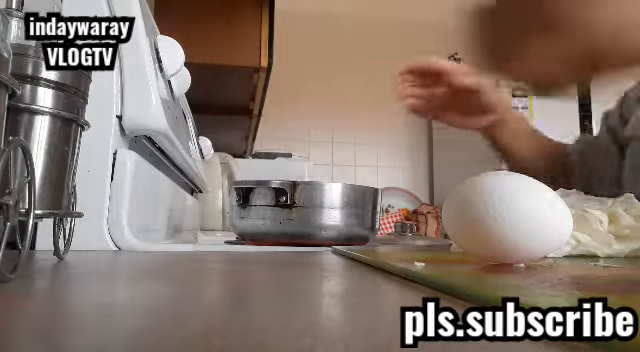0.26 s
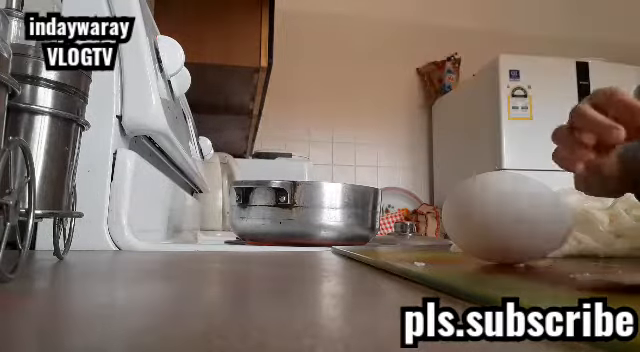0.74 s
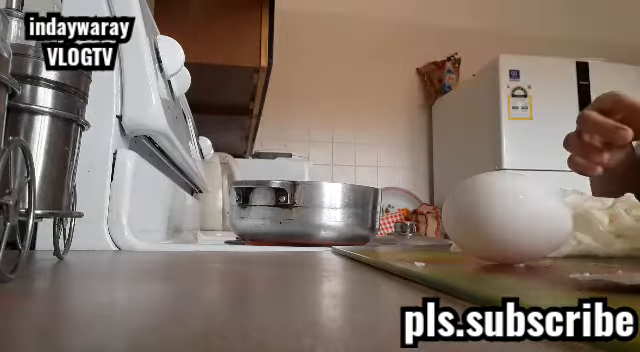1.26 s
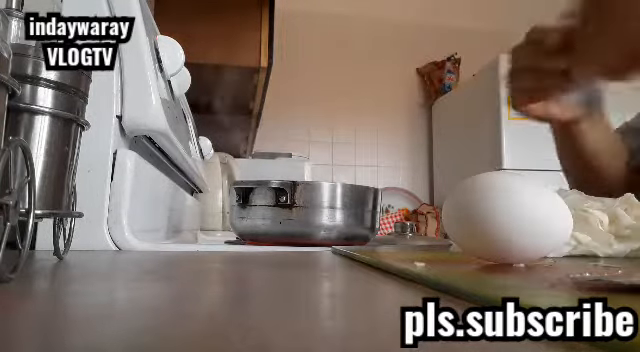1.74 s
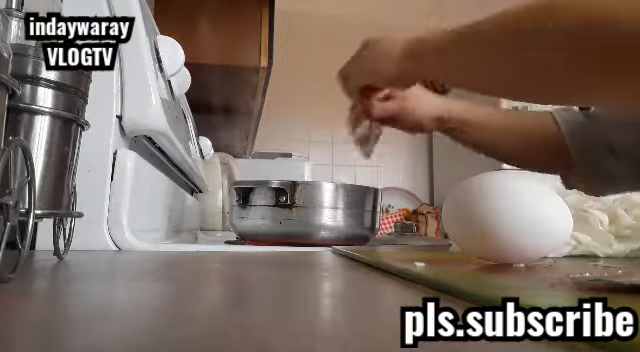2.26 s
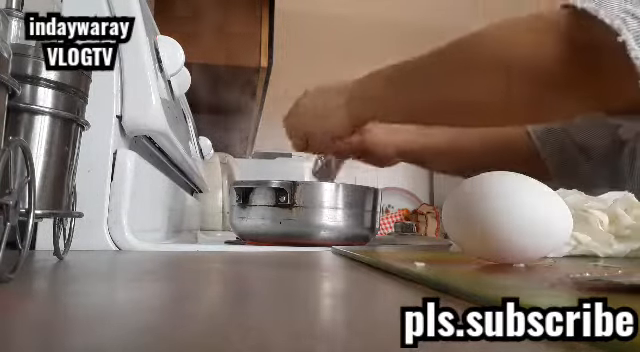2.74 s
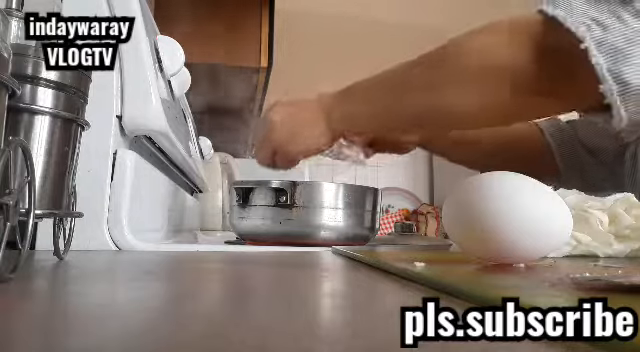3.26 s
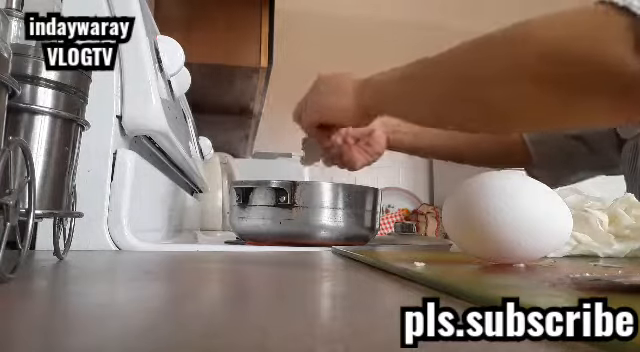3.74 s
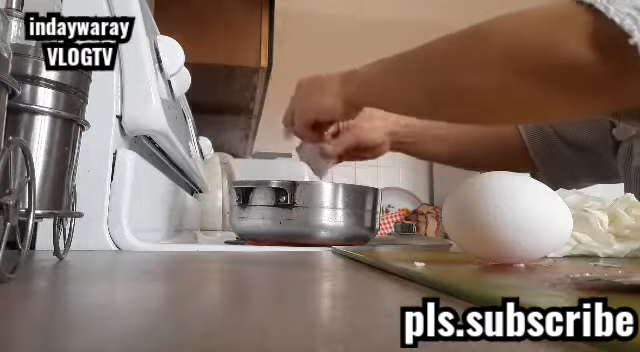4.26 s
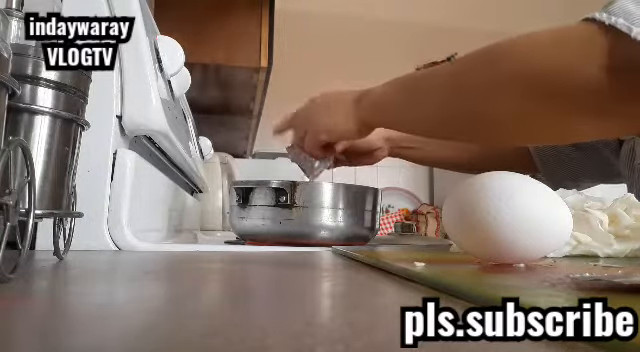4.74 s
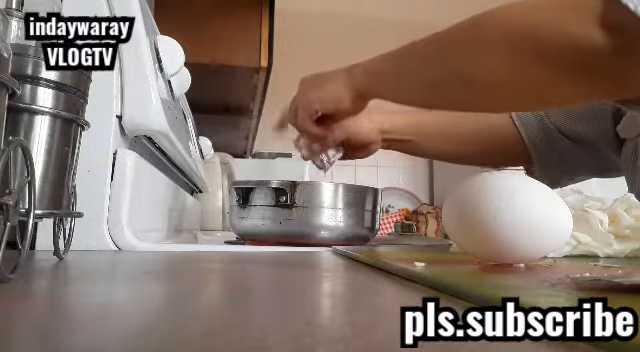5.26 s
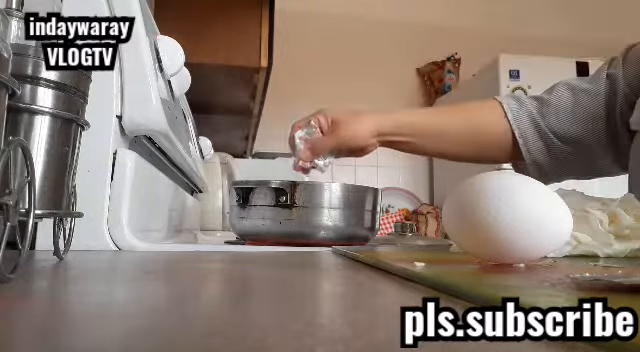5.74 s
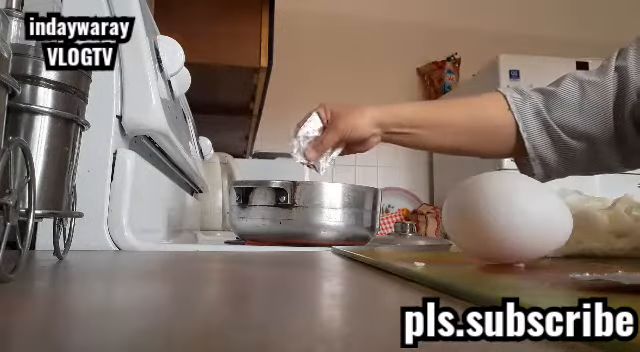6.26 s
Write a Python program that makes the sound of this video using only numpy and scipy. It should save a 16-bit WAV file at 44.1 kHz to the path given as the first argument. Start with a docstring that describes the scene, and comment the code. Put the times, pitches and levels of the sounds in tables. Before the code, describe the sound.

Small foil packets are handled close to a phone-like microphone: dry, bright crackles and sharp creasing snaps in uneven clusters. Early on there are dull hollow knocks and a squeaky scuff against the counter; afterwards only foil, torn and shaken in mid-air, quieter around four seconds and strongest near six. A steady low hum with soft airy rumble stays beneath, in a small reflective room, almost mono.

```python
"""A motor hum and a low rush of air run throughout; at once fingers grip foil packets, which crackle and snap.
In the first two seconds the packets also scuff and knock on a kitchen counter, sounding its wooden ring.
They are then lifted clear, torn, shaken and squeezed over a pan, with the loudest snaps in a late burst.
Foil is shaped pulses and noise, the counter a bank of resonances, the hum drifting sines over noise.
A small hard room adds close echoes and a short tail; the picture stays nearly mono."""
import sys
import numpy as np
from scipy import signal
from scipy.fft import rfft, irfft
from scipy.io import wavfile
from scipy.ndimage import uniform_filter1d

SR = 44100
rng = np.random.default_rng(int(sys.argv[2]) if len(sys.argv) > 2 else 0)


def put_to_file(sound):
    """Save the sound as 16-bit audio at rate SR, in the file named by the first command-line argument."""
    columns = np.atleast_2d(sound).T  # one column per channel
    safe = np.clip(columns, -1, 1)
    whole_steps = np.round(safe * 32767)
    wavfile.write(sys.argv[1], SR, whole_steps.astype(np.int16))


N = 286650
TIME = np.arange(N) / SR

# mains and motor lines: (frequency [Hz], mean level [dB])
HUM_LINES = [(59.2, -78), (105, -75), (119.3, -64), (146, -69), (207, -74.5), (249, -78), (415, -84.5)]
# colour of the steady kitchen air: (frequency [Hz], relative gain [dB])
AIR_COLOUR = [(25, -64), (38, -23), (47, -3), (62, -4), (75, -36), (100, 4.5), (130, 1), (190, 0.5),
              (270, -9.5), (400, -16.5), (650, -28), (2000, -34), (7000, -42.5), (15000, -39.5)]
# colour of a very faint stereo noise floor: (frequency [Hz], relative gain [dB])
SIDE_NOISE_COLOUR = [(25, 9), (60, 13), (125, -14), (250, 10), (500, 7), (1500, 4.5), (5000, 10), (8000, 4),
                     (15000, 1)]
# fingers pinching, tearing or squeezing: (time [s], held for [s], crackle level before layer trims [dB],
# low body against crackle [dB], tearing fizz against crackle [dB])
FINGER_GRIPS = [(0.025, 0.048, -62, -13, -43), (0.102, 0.044, -65.5, 1.5, -44),
                (0.371, 0.057, -49, -6, -17.5), (0.516, 0.096, -54.5, -7, -41), (.6, 0.1, -56, 2, -42),
                (0.761, 0.0081, -62, -23, -37), (.82, 0.32, -70.5, -24, -14),
                (1.095, 0.043, -56.5, -23, -18), (1.196, 0.035, -43.5, -6.5, -38),
                (1.275, 0.022, -44.5, -9, -21), (1.421, 0.094, -47, -12.5, -21.5),
                (1.718, 0.05, -62, -8, -33), (1.785, 0.1, -55.5, -12, -22), (2.081, 0.07, -51, -3, -14.5),
                (2.26, 0.06, -63, -2, -17), (2.37, 0.045, -62, -7, -33), (2.46, 0.1, -60, -8, -18),
                (2.65, 0.089, -53.5, -11, -13), (2.735, 0.098, -53.5, 0, -12.5),
                (2.83, 0.034, -58, -4, -25), (2.939, 0.054, -50, -5, -15), (3.04, 0.077, -50.5, 1, -15),
                (3.149, 0.059, -43, -4, -17), (3.22, 0.051, -52, -3, -15), (3.589, 0.12, -56.5, -8.5, -20),
                (3.921, 0.074, -54.5, -7.5, -25), (4.261, 0.04, -51.5, -9, -13),
                (4.538, 0.068, -49.5, -8.5, -16), (4.74, 0.07, -48.5, -7.5, -15),
                (4.971, 0.083, -54.5, -8.5, -29), (5.126, 0.17, -48, -10, -17), (5.27, 0.037, -58, 1, -29),
                (5.39, 0.42, -71, -2, -13), (5.617, 0.15, -58, -14, -33), (5.77, 0.075, -49.5, -9.5, -21),
                (5.87, 0.099, -51, -18, -15), (5.96, 0.027, -37.5, -11.5, -13),
                (6.039, 0.0084, -39.5, -8, -19), (6.106, 0.089, -53.5, -7, -35),
                (6.202, 0.034, -39, -9.5, -7.5), (6.24, 0.12, -57.5, -7, -28), (6.38, 0.037, -68, -16, -31),
                (6.425, 0.024, -42, -8, -10), (6.478, 0.034, -64, -30, -15)]
# colour of the fine crackle: (frequency [Hz], relative gain [dB])
CRACKLE_COLOUR = [(1200, -44.5), (1750, -44), (1980, -5), (2400, 4.5), (3200, 1.5), (4100, 6), (5300, 3.5),
                  (6400, 2), (8000, -17), (9700, -52), (16000, -33.5)]
# colour of the whole sheet flexing: (frequency [Hz], relative gain [dB])
SHEET_COLOUR = [(120, -5), (300, -4), (450, -6.5), (650, -6), (900, 1), (1400, 3), (1750, -1), (2000, 4.5),
                (2400, -1.5), (4000, -55)]
# colour of fibres parting as the foil tears: (frequency [Hz], relative gain [dB])
FIZZ_COLOUR = [(3000, -23), (7000, 9), (8300, 6), (9700, -23), (12000, -0.5), (16000, -7)]
# loud creases buckling: (time [s], level before the snap trim [dB], facet ring [Hz],
# low body before its trim [dB], top edge before its trim [dB], trailing slips against the click [dB])
CREASE_SNAPS = [(0.047, -56, 4570, -9, -40, 9), (0.1072, -51, 4040, -14, -42, 7),
                (0.3858, -37.5, 5600, -1.5, -6, 5), (.5139, -47, 4200, -16, -35, -2),
                (0.522, -38, 3720, -4, -17, -12), (0.5492, -46, 3800, 1, -47, 6),
                (.557, -38, 2680, 11, -14, 0), (.569, -43, 3530, 7, -24, -10),
                (0.5817, -46, 2800, 8, -40, -8), (0.5992, -40, 3900, -6, -24, 2),
                (0.6181, -38, 3200, 1, -40, 3), (.6399, -33, 3340, -4, -39, -10),
                (0.6611, -34.5, 4200, -3, -40, 5), (0.6693, -37.5, 4400, -16, -35, 8),
                (.676, -38, 4800, 5, -34, -4), (.6965, -39.5, 3080, 8, -46, 10),
                (0.7714, -50, 4700, -35, -31, -2), (1.135, -49, 5130, -19, -35, -1),
                (1.164, -41, 4430, -30, -28, 1), (1.2524, -35, 3550, -13, -46, -6),
                (1.2927, -33, 4300, -1, -8.5, -7), (1.2977, -32.5, 3180, 5.5, -30, -26),
                (1.307, -49, 4700, -8, -32, -10), (1.4028, -46.5, 4900, -27, -20, 4),
                (1.4338, -36.5, 2880, 5.5, -16, -10), (1.4437, -36.5, 4800, -25, -9, -3),
                (1.632, -58, 5070, -4, -33, -3), (1.7113, -54.5, 3900, 6.5, -35, -4),
                (1.7957, -49, 4530, -4, -34, 6), (1.837, -44, 4560, 0.5, -41, -1),
                (2.078, -46.5, 4770, -7, -22, 5), (2.0816, -36, 5600, 3.5, -14.5, 5),
                (2.1135, -43.5, 3280, 8, -11, 11), (2.2585, -41, 3100, -1.5, -24, -3),
                (2.3128, -49.5, 4520, -19, -37, -10), (2.372, -56, 5200, -18, -30, -4),
                (2.398, -47, 4630, -7, -24, 9), (2.462, -52.5, 3950, -9, -32, -10),
                (2.471, -47.5, 5200, -25, -38, -6), (2.5268, -46, 4470, -8, -37, -11),
                (2.533, -34, 4680, -18, -20.5, -20), (2.6548, -44, 4540, -12, -35, -15),
                (2.693, -42, 4800, -15, -8, -3), (2.7103, -44, 5360, -18, -6, -19),
                (2.7145, -36, 3440, -4.5, -11, -5), (2.732, -40, 4740, -21, -6, -1),
                (2.7502, -36.5, 4500, 1.5, -12, -7), (2.7598, -40, 4630, -19, -15, -19),
                (2.7783, -38, 4400, -2, -21, -10), (2.8542, -40, 4330, 0.5, -20, -11),
                (2.939, -43, 4830, -4, -24, 1), (2.968, -44.5, 4750, -3, -10, 0),
                (3.0399, -36, 4400, -25, -16, -2), (3.0426, -37, 4500, -23, -12, -21),
                (3.0553, -41, 5100, -3, -8, 11), (3.1453, -36, 4540, -24, -14, -12),
                (3.1479, -33, 4270, -10, -15, 5), (3.1497, -40, 4900, 12.5, -2, 2),
                (3.1635, -43, 4360, 4, -2, -6), (3.1695, -37, 3870, -4, -2, 10),
                (3.1973, -39.5, 4400, 7, 7, -4), (3.2653, -34, 3930, -0.5, -13.5, -8),
                (3.577, -46.5, 3900, -27, -21, 8), (3.644, -42.5, 3980, 3, -23, 7),
                (3.862, -60.5, 5200, -20, -37, 0), (3.9093, -48, 4000, 1, -30, 15),
                (3.9208, -47, 4150, -14, -32, -3), (3.9335, -48.5, 4030, -14, -29, 0),
                (3.9662, -43, 4800, -6, -45, 12), (4.257, -44.5, 5660, -2.5, -21, 5),
                (4.265, -46, 4660, -3, -20, 8), (4.293, -44.5, 5200, -13, -31, 7),
                (4.43, -49, 3800, -5, -28, -9), (4.5453, -35.5, 3900, -5.5, -39, 1),
                (4.7335, -45, 5200, 3, -38, -5), (4.7455, -36, 4170, 3, -36, -3),
                (4.785, -44, 4300, 9.5, -16, 3), (4.978, -52.5, 3200, -10, -38, -2),
                (5.006, -52, 5600, -14, -28, 6), (5.1207, -39.5, 4550, -28, -43, -1),
                (5.138, -42, 3780, -19, -35, 3), (5.1854, -37, 4500, -2, -11, 7),
                (5.2069, -42, 6340, -15, -18, 2), (5.2333, -39, 4120, -7, -19, 5),
                (5.2375, -45, 4730, 2, -14, -7), (5.333, -48.5, 4800, -5, -32, -3),
                (5.4042, -42.5, 5230, -4.5, -42, -3), (5.4838, -47.5, 3750, -1, -34, 13),
                (5.5667, -54, 4470, -2, -29, 2), (5.6236, -51.5, 4430, -6.5, -68, 5),
                (5.7167, -50, 3380, -10, -25, -2), (5.7305, -44.5, 5100, -8, -22, 0),
                (5.768, -42, 4620, 0, -16, 3), (5.7817, -40, 4440, -18, -19, 3),
                (5.807, -29.5, 4150, -12.5, -21, 5), (5.862, -42, 3700, -20, -38, -4),
                (5.881, -30, 4240, -43, -25, -2), (5.895, -31, 4930, -35, -16, -5),
                (5.95, -40, 5170, -17, -13, 6), (5.9724, -33, 4950, -4, -19, -12),
                (5.9742, -35, 5400, 4, -15, -6), (5.9789, -32, 4250, -7, -19, -2),
                (5.9806, -30, 5400, -0.5, -11, 2), (5.9943, -30.5, 4860, -6, -32, -2),
                (6.032, -36, 4340, -11, -20, 6), (6.0381, -28, 5000, -18, -9, -3),
                (6.0443, -27, 5170, -8, -15, -1), (6.0464, -33, 3970, -4, -14, 1),
                (6.051, -32.5, 3700, 3.5, -3, -12), (6.0947, -26.5, 5800, -46, -34, 1),
                (6.0967, -41, 5300, -30, -30, -22), (6.1004, -37, 5600, -45, -30, 1),
                (6.1913, -35, 3170, -21, -37, -15), (6.1983, -30.5, 5730, -32, -31, 6),
                (6.2068, -31.5, 5300, -4, -12, 1), (6.2177, -31, 5330, -6, -27, -10),
                (6.2205, -26, 5900, -22, -16, -5), (6.223, -46, 4830, -20, -23, -4),
                (6.376, -44, 3300, -12, -43, 2), (6.3946, -38.5, 4560, -8, -30, 13),
                (6.401, -39.5, 2900, -13, -33, -11), (6.4195, -37, 4880, -1, -32, 1),
                (6.4275, -42, 5300, -12, -24, 2), (6.435, -37, 4700, -12, -15, 0),
                (6.4381, -28, 5370, -26, -11.5, 4), (6.479, -35.5, 5150, -35, -28, -4),
                (6.493, -32.5, 3900, -0.5, -6, -8)]
# the foil's main band: (frequency [Hz], relative gain [dB])
FOIL_COLOUR = [(1700, -13.5), (2300, 0), (3200, -2), (4200, -2), (5400, -1), (6500, -5.5), (8000, -10.5),
               (9000, -22)]
# knocks on the counter: (time [s], contact level [dB], contact ring [Hz], board ring level [dB])
COUNTER_KNOCKS = [(0.559, -60, 950, -78), (0.61, -55, 700, -59), (0.6234, -58, 590, -52),
                  (0.638, -58, 770, -56), (.662, -47.5, 640, -54), (.671, -51.5, 680, -77),
                  (0.699, -55, 920, -64), (1.1964, -58, 497, -57), (1.2026, -58, 600, -58),
                  (1.2123, -60, 750, -55), (1.298, -50, 755, -58), (1.4425, -47.5, 895, -60),
                  (1.632, -69, 820, -87)]
# packets scuffing on the counter: (time [s], level [dB], rise [s], decay [s], squeak against scuff [dB])
COUNTER_SCUFFS = [(0.613, -47.5, 0.011, 0.0099, 0.5), (0.665, -54, 0.0063, 0.054, -16),
                  (1.10, -61, 0.031, 0.021, -33), (1.201, -46.5, 0.014, 0.04, -3)]
# resonances of the counter and board: (frequency [Hz], width [Hz], relative gain [dB])
BOARD_MODES = [(158, 22, 6), (191, 12, 10.5), (317, 23, 3), (388, 34, -5.5), (458, 24, -7), (612, 13, -1),
               (795, 18, -11), (918, 24, -1.5), (1030, 16, -24), (1240, 20, -30), (1940, 49, -26),
               (2830, 69, -22)]
# how echoing the handling sounds: very echoing at first, driest near 0.55 s, then more echoing again:
# (time [s], gain into the room [dB])
ROOM_SEND = [(0, 17.5), (.42, -4.5), (.55, -10), (1.3, -4), (1.5, -3.5), (2.1, 2), (6.5, -1)]
# ring time of the kitchen: (frequency [Hz], time to fall 60 dB [s])
ROOM_RING_TIMES = [(200, 0.44), (1000, 0.46), (2800, 0.57), (5500, 0.77), (12000, 0.22)]
# colour of a slight stereo spread added to the tail: (frequency [Hz], gain before ROOM_DB [dB])
SPREAD_COLOUR = [(250, -14.5), (1200, -15), (2500, -25), (5500, -46), (8500, -8), (15000, -4)]

AIR_DB, SIDE_NOISE_DB = -62.5, -78
THROB_S, THROB_PEAK_S, THROB_DB = 0.654, 3.31, 0.5
# a grip builds, slackens while it is held, and lets go
GRIP_ATTACK_S, GRIP_RELEASE_S, GRIP_SAG_DB_PER_S = 0.018, 0.012, 14
# middling creases above the crackle: how many a second, how loud, how uneven
TICK_RATE, TICK_DB, TICK_SPREAD_DB = 83, -12, 3
# heard from all round, the facets of the sheet merge into one broad ring
FACET_WIDTH_HZ, SHEET_HZ, SHEET_WIDTH_HZ = 1200, 4950, 2400
# until the packet is lifted clear of the counter, its foil band sits slightly lower
LIFTED_S, LYING_SHIFT = 2.08, 0.98
ROOM_DB, EARLY_DB = -4.5, -4
TOP_HZ = 15900


def undb(db):
    """Decibels to gain."""
    return 10 ** (np.asarray(db) / 20)


def unit(x):
    """Scale to rms 1."""
    return x / np.sqrt(np.mean(x ** 2))


def shape(points, hz):
    """Gain at hz of a colour given as (Hz, dB) points, joined along a log frequency axis."""
    f, db = np.transpose(points)
    return undb(np.interp(np.log(hz + 1), np.log(f), db))


def causal(gain):
    """Minimum-phase impulse response with these gains, from the folded cepstrum."""
    cepstrum = irfft(np.log(gain + 1e-6))
    half = len(cepstrum) // 2
    cepstrum[1:half] *= 2
    cepstrum[half + 1:] = 0
    return irfft(np.exp(rfft(cepstrum)))


def bins(size):
    """Frequencies of a real transform [Hz]."""
    return np.fft.rfftfreq(size, 1 / SR)


def ring(hz, centre_hz, width_hz):
    """Complex response of one resonance, 1 at its centre."""
    return 1j * hz * width_hz / (centre_hz ** 2 - hz ** 2 + 1j * hz * width_hz)


def noise(gain):
    """Noise of rms 1 with the given response."""
    return unit(irfft(rfft(rng.standard_normal(N)) * gain, N))


def walk(rate_hz):
    """Random drift of rms 1, slower for a lower rate."""
    return noise(np.exp(-(bins(N) / rate_hz) ** 2))


def add(out, s, x):
    """Mix x into out at time s."""
    i = max(int(s * SR), 0)
    out[i:i + len(x)] += x[:max(N - i, 0)]


def hum(waver_db=2, drift_rad=0.61):
    """A motor hums in wavering sines that throb together, over a steady rush of air and a faint stereo floor."""
    lines = 0
    for hz, db in HUM_LINES:
        level = np.sqrt(2) * undb(db + waver_db * walk(6.6))
        lines = lines + level * np.sin(2 * np.pi * hz * TIME + drift_rad * walk(5.0))
    throb = undb(THROB_DB * np.cos(2 * np.pi * (TIME - THROB_PEAK_S) / THROB_S))
    mid = lines * throb + undb(AIR_DB) * noise(shape(AIR_COLOUR, bins(N)))
    side = undb(SIDE_NOISE_DB) * noise(shape(SIDE_NOISE_COLOUR, bins(N)))
    return np.array([mid + side, mid - side])


def grip_levels():
    """Gains of the crackle, the flexing sheet and the tearing fizz as the fingers bite, hold and let go."""
    power = np.zeros((3, N))
    for s, held_s, db, low_db, fizz_db in FINGER_GRIPS:
        before = np.maximum(s - TIME, 0) / GRIP_ATTACK_S
        after = (TIME - s - held_s) / GRIP_RELEASE_S
        outside = np.maximum(before ** 2, after)
        # the level sags about the middle of the hold
        sag_db = GRIP_SAG_DB_PER_S * np.clip(TIME - s - held_s / 2, -held_s / 2, held_s / 2)
        press = np.exp(-np.clip(outside, 0, 20)) * undb(-sag_db)
        layers_db = db + np.array([[0], [low_db], [fizz_db]])
        power += (undb(layers_db) * press) ** 2
    return np.sqrt(power)


def crackle(grip, flexing, tearing, gain_db=-11.0, body_db=-12.5, fizz_db=-2.0,
            rate=600, spread_db=0.5, facet_width_hz=850, count=14):
    """Countless tiny creases give way on facets of several pitches, flex the sheet and fizz as it tears."""
    hz = bins(size=1024)
    fine, slips = 0, 0
    for facet_hz in np.geomspace(2300, 7200, count):
        size = undb(spread_db * np.minimum(rng.exponential(size=N), 4))
        # rate is creases a second over all the facets
        struck = rng.random(N) < rate / count / SR
        grains = struck * size * rng.choice([-1, 1], N)
        colour = shape(CRACKLE_COLOUR, hz) * (0.017 + abs(ring(hz, facet_hz, facet_width_hz)))
        fine = fine + signal.oaconvolve(grains, causal(colour))[:N]
        slips = slips + grains
    flex = signal.oaconvolve(slips, causal(shape(SHEET_COLOUR, hz)))[:N]
    fizz = noise(shape(FIZZ_COLOUR, bins(N))) * uniform_filter1d(abs(slips), size=60)
    out = undb(gain_db) * grip * unit(fine)
    out = out + undb(body_db) * flexing * unit(flex)
    return out + undb(fizz_db) * tearing * unit(fizz)


def ticks(grip, flexing, body_db=-3, settle_s=0.00092, low_hz=2500, high_hz=6500, facet_width_hz=1400):
    """Middling creases give way at uneven gaps under the fingers, each fluttering on its own facet pitch."""
    hz, t = bins(size=1024), TIME[:512]
    gap, size = rng.exponential(size=(N // 300, 2)).T
    flutter = rng.standard_normal((len(gap), len(t))) * np.exp(-t / settle_s)
    pitches = rng.uniform(low_hz, high_hz, len(gap))
    times = np.cumsum(gap) / TICK_RATE
    pulses, rung = np.zeros(N), np.zeros(N)
    for s, steps, slips, facet_hz in zip(times, np.minimum(size, 2), flutter, pitches):
        slips = undb(TICK_SPREAD_DB * steps) * slips
        facet = 0.22 + ring(bins(size=512), facet_hz, facet_width_hz)
        add(pulses, s, slips)
        add(rung, s, irfft(rfft(slips) * facet))
    fine = unit(signal.oaconvolve(rung, causal(shape(CRACKLE_COLOUR, hz)))[:N])
    flex = unit(signal.oaconvolve(pulses, causal(shape(SHEET_COLOUR, hz)))[:N])
    return undb(TICK_DB) * (grip * fine + undb(body_db) * flexing * flex)


def snaps(gain_db=-5.0, facet_db=17.5, settle_s=0.0037, body_db=1.5, edge_db=-3,
          bend_s=.0007, all_round_db=0):
    """A crease flips and rings its facet, then slips raggedly; returns the aimed sound and a broader one."""
    hz, t = bins(size=1024), TIME[:1024]
    aimed, all_round = np.zeros(N), np.zeros(N)
    # bending waves cross the foil more slowly at low frequencies; bend_s is the delay at 4 kHz
    travel = np.exp(-4j * np.pi * bend_s * np.sqrt(4000 * hz))
    edge_colour = shape([(3000, 1), (9700, -0.5), (12000, 8.0)], hz)
    for s, db, facet_hz, low_db, top_db, slips_db in CREASE_SNAPS:
        foil_hz = hz / (LYING_SHIFT if s < LIFTED_S else 1)
        foil = shape(FOIL_COLOUR, foil_hz) * np.minimum(foil_hz / 1900, 1) ** 5 / (1 + (hz / 9300) ** 16)
        body = undb(low_db + body_db) * shape(SHEET_COLOUR, hz)
        edge = undb(top_db + edge_db) * edge_colour

        def strike(peak):
            """Spectrum of the click when the foil rings with this peak."""
            main = foil * (0.24 + undb(facet_db) * peak)
            return rfft(causal(np.sqrt(main ** 2 + body ** 2 + edge ** 2))) * travel

        click = strike(abs(ring(hz, facet_hz, FACET_WIDTH_HZ)))
        merged = abs(ring(hz, np.sqrt(facet_hz * SHEET_HZ), SHEET_WIDTH_HZ))
        broad = strike(merged * np.sqrt(FACET_WIDTH_HZ / SHEET_WIDTH_HZ))
        slips = rng.standard_normal(len(t)) * np.exp(-t / settle_s) * (t > .0005)
        snap = unit(irfft(click)) + undb(slips_db) * unit(irfft(click * rfft(slips)))
        # the level is set over the first 4 ms
        attack = snap[:175]
        snap = snap * undb(db + gain_db) / np.sqrt(np.mean(attack ** 2))
        add(aimed, s - bend_s, snap)
        add(all_round, s - bend_s, undb(all_round_db) * np.std(snap) * unit(irfft(broad)))
    return aimed, all_round


def counter(grit_db=4, tap_width_hz=500, squeak_hz=2390, squeak_width_hz=220):
    """Knocks thud and wake the board's ring; gritty scuffs drive it too and squeak where pressed hardest."""
    hz = bins(N)
    grit = rng.standard_normal(N) * undb(grit_db * walk(170))
    board = sum(undb(db) * ring(hz, f, width) for f, width, db in BOARD_MODES)
    board = board * np.minimum(hz / 160, 1) ** 3
    out = np.zeros(N)

    soft_push = 1 / (1 + 1j * hz / 900)
    after_ring = irfft(board * soft_push, N)[:8192]
    after_ring = after_ring / np.sqrt(np.mean(after_ring[:1024] ** 2))
    for s, db, tap_hz, board_db in COUNTER_KNOCKS:
        tap = irfft(ring(bins(size=4096), tap_hz, tap_width_hz) ** 2)
        add(out, s, undb(db) * tap / np.sqrt(np.mean(tap[:256] ** 2)))
        add(out, s, undb(board_db) * after_ring)

    wood = unit(irfft(rfft(grit) * board, N))
    squeak = noise(ring(hz, squeak_hz, squeak_width_hz) ** 2)
    for s, db, rise_s, decay_s, squeak_db in COUNTER_SCUFFS:
        push = np.exp(-np.maximum((s - TIME) / rise_s, (TIME - s) / decay_s))
        out += undb(db) * push * (wood + undb(squeak_db) * push * squeak)
    return out


def tail(build_s=0.0018):
    """Diffuse answer of the tiled walls, of energy 1; each octave dies away at its own rate."""
    t, hz = TIME[:SR // 2], bins(size=SR // 2)
    white, out = rfft(rng.standard_normal(len(t))), 0
    octave = np.log2(np.clip(hz, 125, 16000) / 125)
    for k in range(8):
        t60 = np.interp(125 * 2 ** k, *np.transpose(ROOM_RING_TIMES))
        band = irfft(white * np.maximum(1 - abs(octave - k), 0))
        out = out + band * np.exp(-np.log(1000) * t / t60)
    out = out * (1 - np.exp(-t / build_s))
    return out / np.linalg.norm(out)


def room(direct, all_round, early_s=0.0052, count=5):
    """Stove and counter throw back close echoes and tiled walls add a tail, in a randomly drifting blend."""
    t = TIME[:SR // 2]
    sent = all_round * undb(np.interp(TIME, *np.transpose(ROOM_SEND)))
    blend = np.array([walk(3.5) for _ in range(count)])
    mid = direct
    # the squared shares always add up to 1
    for share in blend / np.linalg.norm(blend, axis=0):
        echoes = rng.standard_normal(len(t)) * (rng.random(len(t)) < .06)
        early = echoes * np.exp(-t / early_s) * (t > .0012)
        answer = undb(ROOM_DB) * tail() + undb(EARLY_DB) * early / np.linalg.norm(early)
        mid = mid + signal.fftconvolve(sent * share, answer)[:N]
    spread_tail = signal.fftconvolve(sent, tail())[:N]
    side = undb(ROOM_DB) * irfft(rfft(spread_tail) * shape(SPREAD_COLOUR, bins(N)), N)
    return np.array([mid + side, mid - side])


def scene():
    """Foil and counter sound in the kitchen, over its hum."""
    background = hum()
    grip, flexing, tearing = grip_levels()
    handling = crackle(grip, flexing, tearing) + ticks(grip, flexing)
    aimed, all_round = snaps()
    handling = handling + counter()
    return room(aimed + handling, all_round + handling) + background


def record(dry):
    """The phone rounds the sharpest peaks and cuts the top."""
    rounded = dry / (1 + (dry / .085) ** 4) ** .25
    return signal.sosfilt(signal.ellip(10, .2, 70, TOP_HZ, fs=SR, output="sos"), rounded)


dry = scene()
out = record(dry)
put_to_file(out)
```